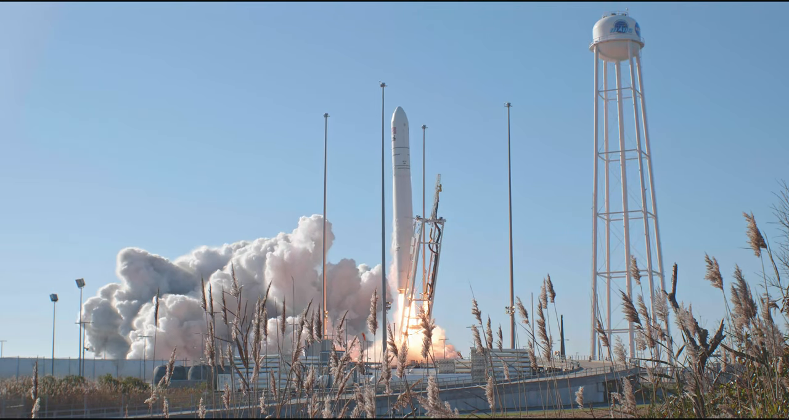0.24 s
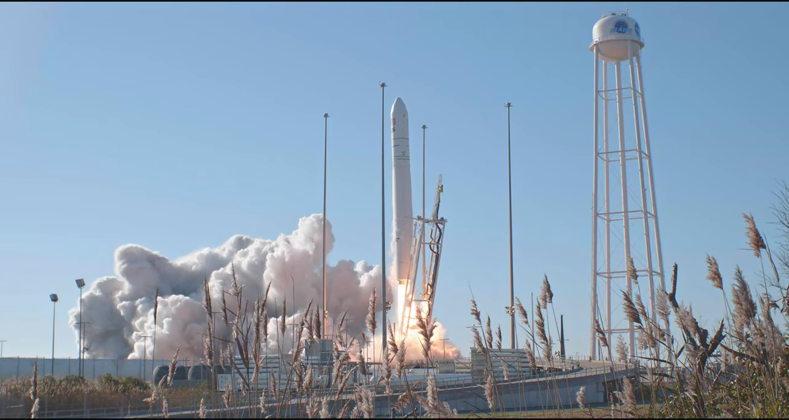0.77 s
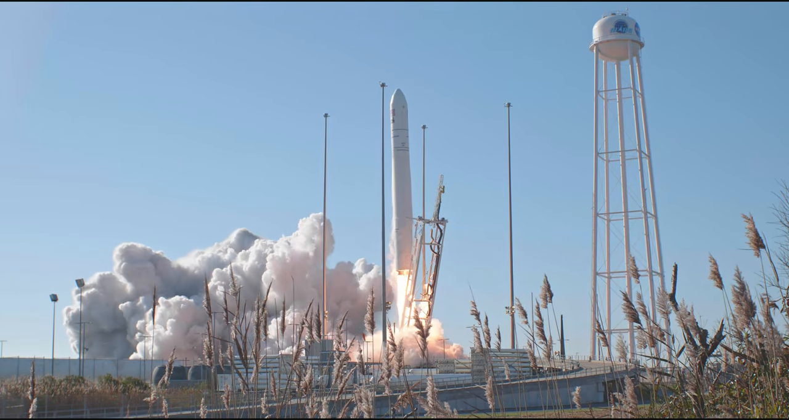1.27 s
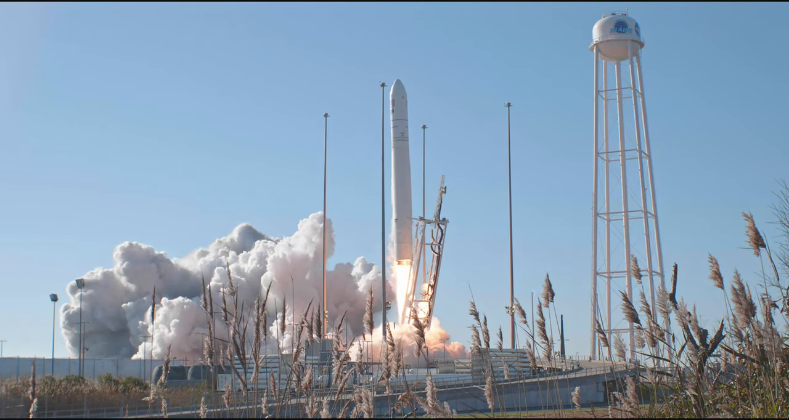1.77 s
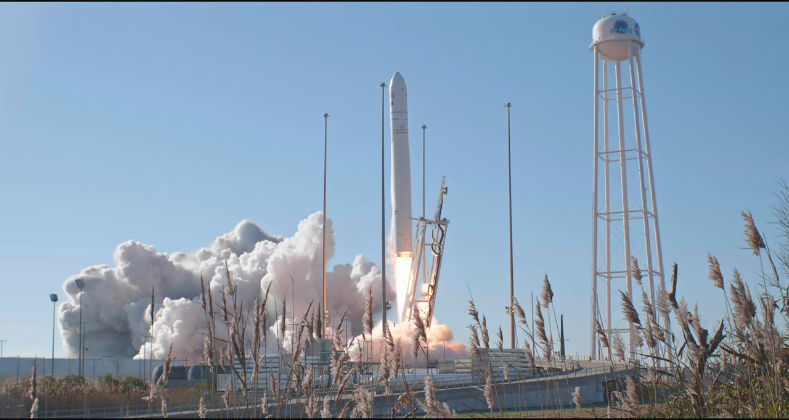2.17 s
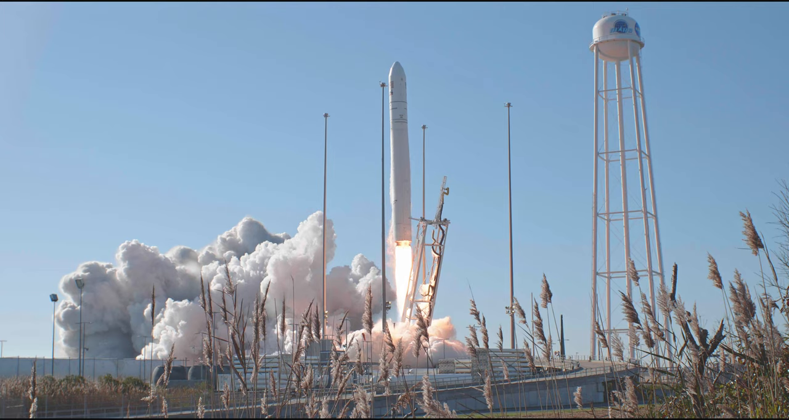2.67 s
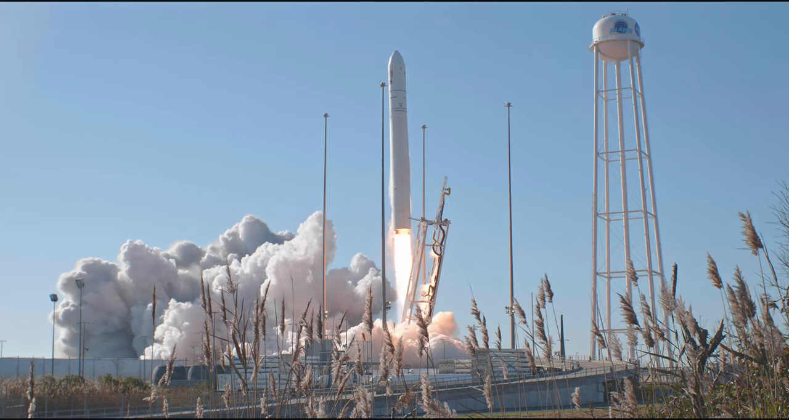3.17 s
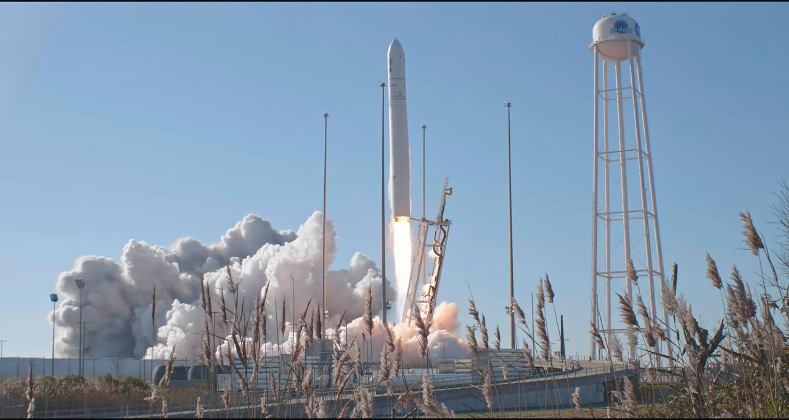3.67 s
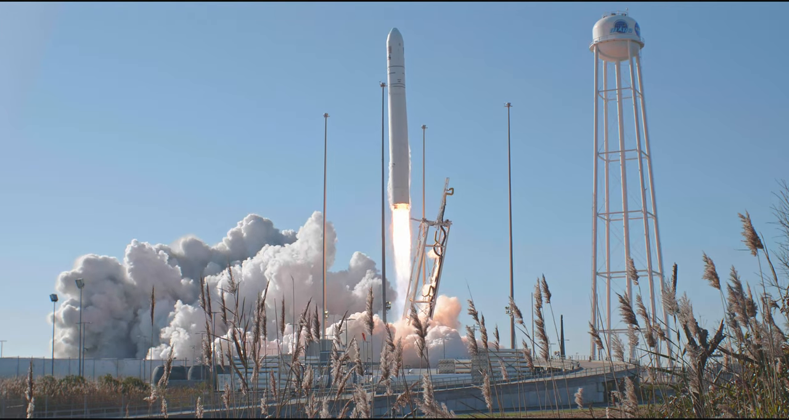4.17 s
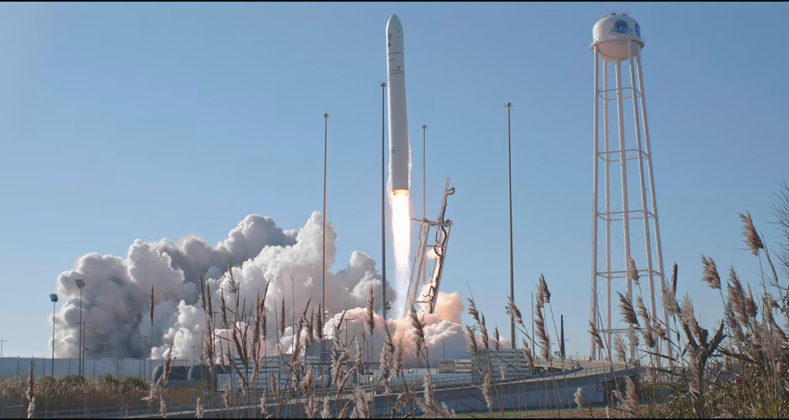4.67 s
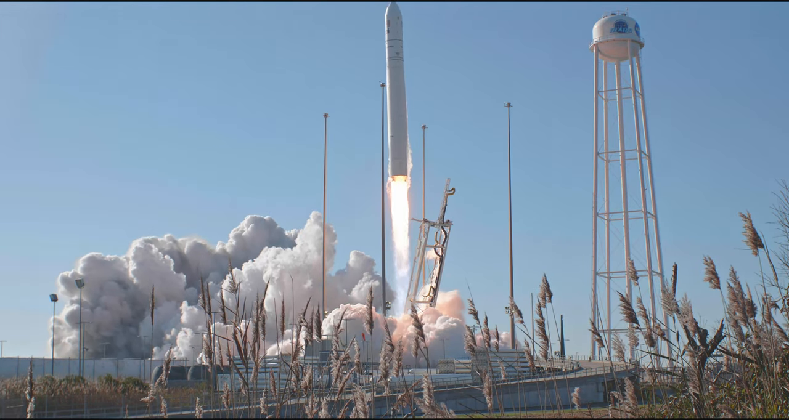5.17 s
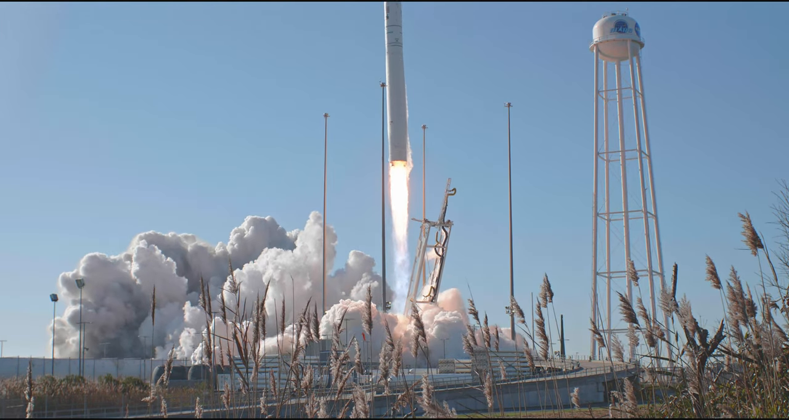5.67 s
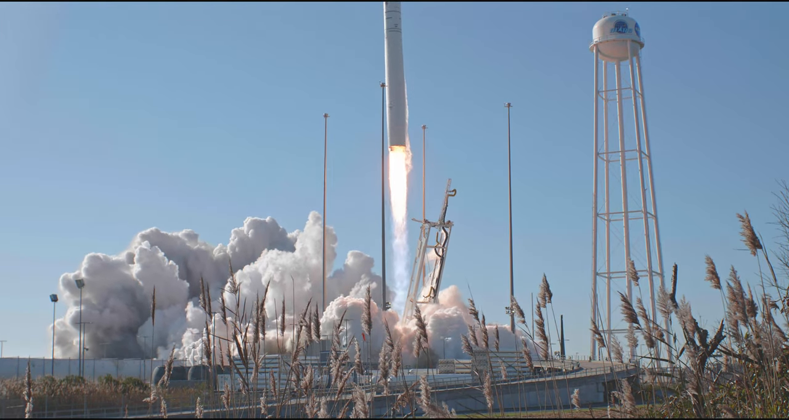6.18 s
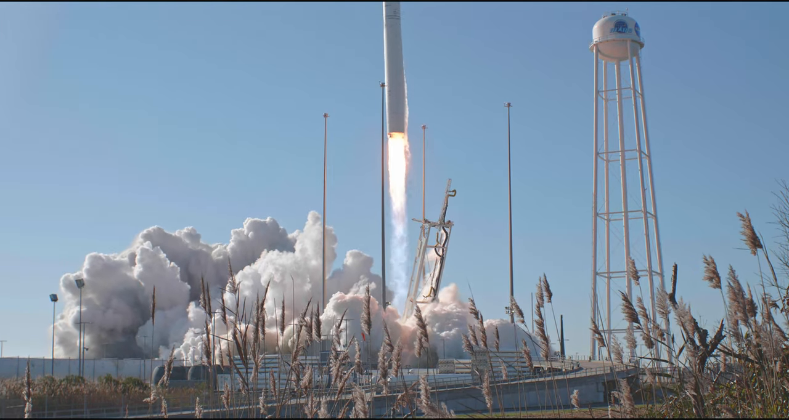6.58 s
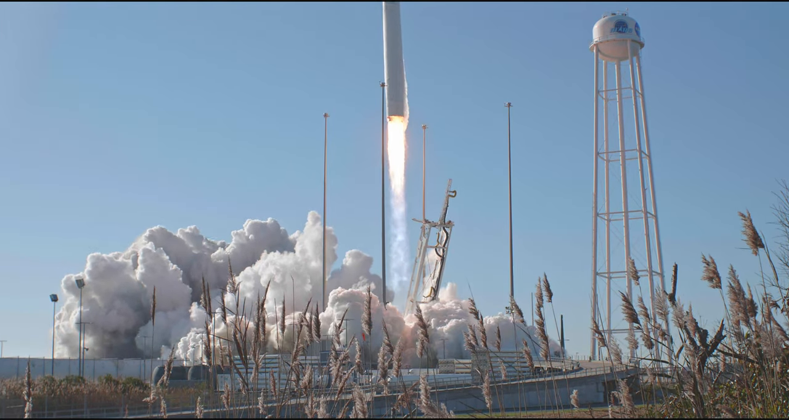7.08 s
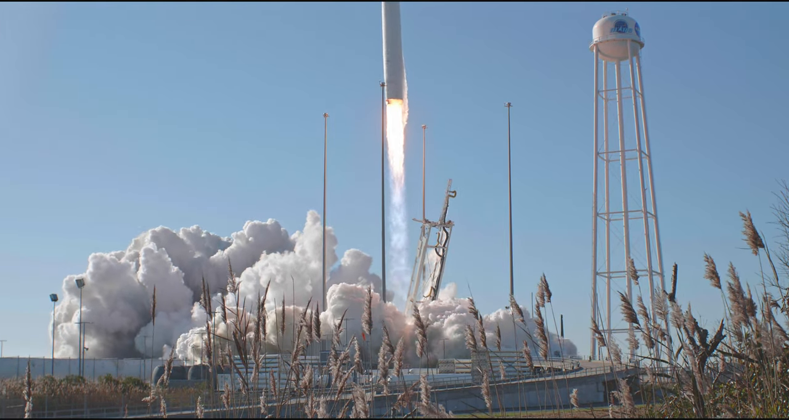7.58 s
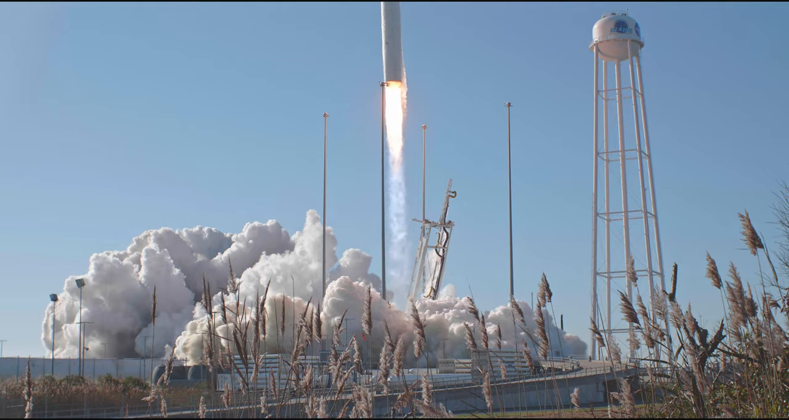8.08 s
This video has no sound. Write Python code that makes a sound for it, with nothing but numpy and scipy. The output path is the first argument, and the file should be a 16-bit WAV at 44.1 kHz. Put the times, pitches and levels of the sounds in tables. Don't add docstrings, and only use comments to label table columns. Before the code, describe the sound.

A rocket leaves its pad, heard outdoors across a marsh. A massive low roar is already at full force, with brief spray hiss and thin ticks. Crackle breaks through around two to three seconds, dulls behind steam, then returns much brighter after six. The stereo microphone is overloaded throughout, its flattened peaks rasping and fizzing.

```python
import sys
import numpy as np
from scipy import signal
from scipy.fft import rfft, irfft, next_fast_len
from scipy.io import wavfile
from scipy.ndimage import uniform_filter1d

SR = 44100
rng = np.random.default_rng(int(sys.argv[2]) if len(sys.argv) > 2 else 0)


def makeup_ratio(level_db):
    decades = np.asarray(level_db, float) / 20
    return 10 ** decades


def wav_record(signal):
    frames = np.transpose(np.atleast_2d(signal))
    bounded = np.clip(frames, -1, 1)
    quanta = np.round(bounded * 32767).astype(np.int16)
    wavfile.write(sys.argv[1], SR, quanta)


N = 367353

EDDY_CENTRES = (40, 100, 260, 1000)
# [level/dB, share of bareness swing, share of trench swing, share of column swing,
# gain once clear of the cloud/dB]
EDDY_LEVELS = [
    (-15, 0.01, 1, 0.0044, 0),
    (-18, 0.01, -0.45, -0.66, -2),
    (-17, 0.12, 0.16, 0.97, 0.5),
    (-28.5, 0.23, 0.021, -0.18, 4.5),
]
# [f/Hz, level per Hz/dB]
JET_SPECTRUM = [(12, -11.5), (28, -7.5), (50, 2.5), (100, 4), (200, -2.5), (400, -14.5), (800, -25),
                (1600, -39), (3200, -51), (6400, -85.5), (11000, -87), (16000, -88)]
# [f/Hz, likeness 0-1]
STEREO_LIKENESS = [(30, 1), (125, 0.98), (250, 0.98), (500, 0.85), (1000, 0.88), (2000, 0.4), (5000, 0),
                   (12000, 0.5)]
# [t/s, level/dB]
BARENESS = [(0, -42.5), (.3, -44.5), (.85, -53.5), (1.6, -59.5), (2.0, -48.5), (2.45, -45), (2.85, -43),
            (3.2, -56), (3.8, -58.5), (4.5, -59), (5.3, -50), (5.9, -53.5), (6.3, -44.5), (6.6, -47.5),
            (7.3, -46.5), (7.9, -43.5), (8.1, -44), (8.33, -46.5)]
# [t/s, level/dB]
TRENCH_RUMBLE = [(0, -5.5), (.5, 2), (2, 1), (3, -2.5), (4.2, 1.5), (5.3, 1), (6.4, 1), (7.2, -2),
                 (7.8, -16), (8.33, -6.5)]
# [t/s, level/dB]
FLAME_COLUMN = [(0.0, -23.5), (0.44, -23), (1.04, -20.5), (1.18, -19.5), (1.62, -20), (2.04, -18.5),
                (2.81, -19.5), (2.99, -17), (4.73, -23), (4.92, -21), (5.5, -24), (5.91, -17.5),
                (6.49, -19.5), (7.21, -17), (8.1, -18.5), (8.33, -15)]
# [t/s, f/Hz, level/dB]
BOOM_GLIDE = [(0, 74.85, -14), (.6, 70.24, -19.5), (1.3, 79.78, -15), (1.7, 95, -19), (2.4, 60, -30),
              (3.3, 99.75, -19), (4.3, 95.2, -22.5), (5.201, 39.95, -25), (5.8, 65.05, -22),
              (6.6, 110.4, -23), (7.302, 164.8, -22), (7.8, 175.3, -19.5), (8.33, 175.3, -20)]
# [t/s, f/Hz, level/dB]
HOWL_GLIDE = [(0, 330, -36), (1.8, 330, -32), (2.4, 260.1, -27), (3.0, 300, -24), (3.6, 240, -27.5),
              (4.5, 199.3, -35.5), (6.0, 190.4, -27.5), (7.0, 250.3, -29), (8.33, 200.2, -28)]
# [t/s, peak
# level of bright edge/dB, left minus right/dB, body over edge/dB]
HARD_FRONTS = [(0.944, -50, 4.5, 0.5), (0.9872, -44.5, -0.5, 5), (1.1428, -42, 2, 2), (1.36, -45, -4, 2),
               (1.639, -45.5, -3, 1.5), (1.6733, -52, 3.5, 5), (1.7762, -38, 1, 6.5), (1.8926, -46, 0, 0.5),
               (2.0458, -47, 3, 4.5), (2.1281, -47, 1, 7), (2.1791, -52, 3.5, 2), (2.2302, -46, -2, 11),
               (2.3366, -50, 0, 2.5), (2.3881, -44, 0.5, 4.5), (2.4251, -45, -1.5, 10.5),
               (2.4565, -40, 2.5, 8), (2.486, -44.5, -0.5, 4), (2.5031, -45.5, 1.5, 7), (2.627, -49, 1, 7),
               (2.6624, -51.5, 1.5, 12.5), (2.6808, -47.5, 0, 5), (2.7068, -45.5, 4.5, 6.5),
               (2.7509, -43.5, 2, 7), (2.8265, -43, -1, 4), (2.9065, -45.5, -2, -3.5),
               (2.9296, -44.5, -1.0, 5), (2.9491, -44, -3.5, 6.5), (3.0062, -44, -2.5, 8),
               (3.061, -39, 1, 4), (3.1191, -38.5, -4, 6.5), (3.1351, -40, -2, -1), (3.204, -50.5, 3, 3),
               (3.28, -52.5, -2, 6), (3.294, -45.5, -0.5, 0), (3.3559, -46.5, -4, -1),
               (3.4403, -51.5, -2.5, 6.5), (3.506, -47.5, 1, 4.5), (3.5313, -43, -3, 5),
               (3.5707, -50, 3, 8.5), (3.6687, -50, -3, 4), (3.8871, -45, -3, 0.5), (4.3472, -49.5, -2, 1),
               (4.5516, -51, 2, -1), (4.581, -51.5, -2.5, 2.5), (4.69, -53, 0.5, 3), (5.1797, -51.5, -1, 3),
               (5.3354, -48, -2, 7.5), (5.391, -46, -1.5, -1),
               (5.9289, -51, 0.5, 8.5), (6.1425, -53.5, -4, 7), (6.174, -40.5, 1.5, 2),
                    (6.2018, -45.5, -2, 11), (6.3058, -50.5, -1, 8), (6.3229, -40, -3, 6),
                    (6.3631, -44, -3, 7), (6.4288, -46.5, -2, 9), (6.493, -42, -2, 8.5),
                    (6.5716, -45, 2, 15), (6.5934, -38.5, -4, 6.5), (6.7244, -42, 2, 9),
                    (6.7545, -41, -3, 5), (6.8153, -55, -0.5, 9.5), (6.8277, -38, -2.5, 2.5),
                    (6.8498, -44, -3, 8.5), (6.87, -40.5, -1, 8.5), (6.917, -37.5, -1.5, 4),
                    (7.1378, -41.5, -0.5, 5.5), (7.1998, -43.5, 0.5, 5), (7.3375, -43, 2, 3),
                    (7.4148, -47.5, 0.5, 5.5), (7.4292, -48, -2, 5.5), (7.466, -41, -3, -0.5),
                    (7.4853, -41.5, 4.5, 0), (7.551, -40, 7, -5.5), (7.5928, -36.5, 2, -2),
                    (7.614, -42.5, 5.5, 7.5), (7.6272, -34.5, 2.0, 0), (7.6575, -41, -0.5, -1),
                    (7.7159, -44, 2.5, 9), (7.7657, -40, 3.5, 6), (7.786, -39, -1, 0.5),
                    (7.826, -34, 1, 0.5), (7.843, -40, 1, 4), (7.8614, -35, 1.5, -1),
                    (7.9082, -43.5, 0.5, 5), (7.9252, -37.5, 1.5, 6.5), (7.9431, -38, 3.5, 7),
                    (7.9852, -35.5, 3.5, 7.5), (8.02, -38, -1.5, 8), (8.061, -40, 1, 6.5),
                    (8.0999, -42, -2.5, 6), (8.1274, -43, -2, 8), (8.1578, -27.5, -4, 2),
                    (8.2144, -45.5, 0.5, 7), (8.2268, -37, 3.5, 4.5), (8.247, -42.5, -0.5, 6.5),
                    (8.268, -43.5, -4, 2.5), (8.2853, -40, -0.5, 5.5)]
# [t/s, peak level of the top/dB, body over top/dB]
THIN_TICKS = [(0.5263, -54, 7.5), (0.6033, -60.5, 13.5), (0.7238, -54.5, 9.5), (0.7579, -55, 8),
              (0.7977, -62.5, 13.5), (0.8243, -59, 11), (0.867, -62, 11), (0.8878, -55, 7.5),
              (0.9433, -60, 11), (0.9676, -57.5, 13.5), (0.9872, -53.5, 10), (1.0677, -60, 13),
              (1.1074, -58, 13), (1.1419, -52, 10), (1.1973, -57.5, 10.5), (1.2203, -60, 12),
              (1.2327, -57, 9.5), (1.3487, -56, 11.5), (1.3609, -50.5, 6), (1.3838, -58, 7),
              (1.4137, -56, 11), (1.4472, -59, 10), (1.6094, -54.5, 6.5), (1.6392, -53, 7),
              (1.6737, -56, 11), (1.7207, -54, 7), (1.762, -56.5, 13.5), (1.7759, -50.5, 9),
              (1.8277, -58, 15), (1.8564, -60, 13), (1.8697, -58.5, 10.5), (1.8927, -51, 8),
              (1.953, -55.5, 12.5), (2.0757, -55, 11.5), (2.098, -54, 10), (2.1276, -55, 13),
              (2.1795, -56.5, 13), (2.2219, -51.5, 13.5), (2.2733, -56, 13), (2.3008, -55, 12),
              (2.3176, -53, 9.5), (2.3656, -54, 16), (2.3875, -52, 14), (2.411, -54.5, 16.5),
              (2.3879, -51.5, 14), (2.4108, -56, 15), (2.4455, -57, 18), (2.4567, -47.5, 9),
             (2.4857, -54, 14), (2.5031, -54, 14), (2.5216, -53.5, 11), (2.554, -56.5, 14),
             (2.6094, -58, 16), (2.6268, -51.5, 12), (2.6385, -54, 14), (2.6627, -50.5, 13),
             (2.6802, -54, 16), (2.7076, -52.5, 14), (2.751, -48.5, 9), (2.7938, -52.5, 12),
             (2.8259, -54.5, 15), (2.8498, -54.5, 10), (2.8728, -59, 13), (2.8937, -50.5, 10),
             (2.9062, -51, 10), (2.9291, -52.5, 14), (2.9497, -54, 13), (2.9744, -58.5, 16),
             (3.007, -55.5, 15), (3.0322, -54, 12), (3.0613, -49, 8), (3.0921, -54.5, 8),
             (3.1187, -49.5, 5), (3.1357, -47, 3), (3.1553, -56, 12), (3.1804, -58.5, 11), (3.204, -57, 6),
             (3.2399, -58, 12), (3.2618, -55, 8), (3.2798, -59.5, 14), (3.2953, -57, 14), (3.3567, -56, 11),
             (3.3951, -66, 16), (3.412, -57.5, 10), (3.441, -58.5, 13), (3.4509, -60, 14),
             (3.5053, -57.5, 11), (3.5323, -56, 11), (3.5707, -63, 18), (3.5851, -57, 5),
             (3.6046, -60.5, 11), (3.6208, -54, 7), (3.637, -54.5, 8), (3.6684, -52.5, 5),
             (3.7594, -60.5, 11), (3.7971, -63, 18), (3.8157, -54, 9), (3.8485, -56.5, 12),
             (3.8864, -51, 7),
              (3.8864, -51, 7), (3.935, -60, 11), (3.9751, -59.5, 8), (4.0514, -65, 13), (4.0663, -62, 14),
               (4.0964, -57, 8.3), (4.1248, -54.5, 2), (4.1609, -54.5, 4), (4.2, -57.5, 8),
               (4.248, -61, 11), (4.284, -60.5, 10), (4.3184, -57.5, 5), (4.3463, -55, 5), (4.3837, -59, 9),
               (4.4426, -59.5, 11), (4.4596, -55.5, 6), (4.5035, -60, 6), (4.5381, -60, 13),
               (4.5514, -58, 12), (4.5808, -54.5, 7), (4.6905, -61, 10), (4.7297, -57, 10),
               (4.7545, -59, 11), (4.7848, -60, 11), (4.8498, -59, 12), (4.8721, -53.5, 3),
               (4.8891, -59, 12), (4.931, -56.5, 6), (5.0293, -62.5, 11), (5.1216, -57.5, 10),
               (5.1789, -59.5, 13), (5.2496, -62, 14), (5.2912, -59.5, 11), (5.3366, -52.5, 12),
               (5.3915, -52.5, 4), (5.4121, -59, 11), (5.4548, -58.5, 12), (5.5151, -61.5, 14),
               (5.598, -63.5, 11), (5.6104, -58, 7), (5.6444, -61, 11), (5.6977, -62.5, 16),
               (5.7246, -61, 11), (5.8018, -60.5, 15), (5.8525, -58.5, 14), (5.8974, -60.5, 12),
               (5.9167, -65, 22), (5.9292, -55.5, 11), (6.042, -61, 13), (6.0599, -58.5, 17),
               (6.1038, -58.5, 11), (6.1193, -57, 12), (6.1422, -53, 14), (6.1742, -45, 7),
               (6.2021, -53.5, 13), (6.3074, -54, 14),
              (6.3073, -54, 10), (6.3236, -51, 14), (6.3627, -52, 13), (6.4315, -52, 14),
               (6.4633, -51, 14), (6.5245, -54, 16), (6.5548, -54, 17), (6.5932, -46.5, 12),
               (6.6764, -57.5, 16), (6.6997, -57, 19), (6.7558, -47, 10), (6.8305, -47.5, 11),
               (6.8685, -48.5, 12), (6.9169, -48, 13), (6.9383, -52, 11), (7.003, -53, 12),
               (7.1025, -53.5, 13), (7.1379, -50.5, 10), (7.1481, -50, 9), (7.1647, -51.5, 13),
               (7.1988, -48.5, 9), (7.2302, -49, 11), (7.2569, -50, 7), (7.276, -49, 12.5),
               (7.3365, -43, 5), (7.4168, -59, 18), (7.4273, -50, 13), (7.4836, -48.5, 7), (7.531, -55, 12),
               (7.5523, -43.5, 0), (7.5937, -43.5, 6), (7.6193, -43.5, 8), (7.6578, -48, 12),
               (7.7153, -50, 13), (7.7664, -47, 13), (7.7845, -46.5, 5), (7.8249, -41.5, 4),
               (7.8446, -43.5, 4), (7.9082, -48, 10), (7.9261, -44.5, 13), (7.9445, -42.5, 12),
               (7.97, -50, 15), (7.983, -43.5, 12), (8.0179, -46, 11), (8.0618, -45.5, 8),
               (8.0788, -53, 12), (8.0997, -48, 9.5), (8.1268, -45.5, 8), (8.1579, -40.5, 2),
               (8.2155, -45.5, 9), (8.2703, -43.5, 5)]
# [t/s, level/dB]
MIXING_VIGOUR = [(0.03, -58), (0.26, -56.5), (0.49, -59), (0.79, -61.5), (1.69, -66.5), (2.13, -65.5),
                 (2.9, -59.5), (3.29, -69.5), (3.61, -75), (4.47, -74.5), (5.02, -70.5), (5.46, -71),
                 (5.83, -70), (6.5, -57), (6.83, -58.5), (7.52, -54), (7.82, -54.5), (8.33, -55.5)]
# [t/s, strength 0-1, lag/ms]
MARSH_ECHO = [(0, 0, 4), (1.3, .3, 4), (2, .2, 3.6), (2.6, 0.3, 3.5), (3.3, 0.3, 3.6), (4, 0.3, 3.7),
              (4.7, .1, 4.5), (5.5, .1, 5.5), (6.5, .1, 6.5), (7.5, 0.22, 8), (8.33, 0, 9.7)]

FRONT_DB, FRONT_FOLLOWS = -44, 0.97
DELUGE_DB = 12
PAN_DB = 4.5
SNAP_GAP = 200
SKEW_SAMPLES = 1.5
CRACKLE_OWN = 1.1


def exhaust():
    size = next_fast_len(N)
    hz = np.maximum(np.arange(size // 2 + 1) * SR / size, 1)
    mid, side = rfft(rng.standard_normal((2, size)))
    alike = np.clip(at_hz(STEREO_LIKENESS, hz), 0, 1)
    pair = np.sqrt(1 + alike) * mid + np.sqrt(1 - alike) * side * [[1], [-1]]
    pair = pair * makeup_ratio(at_hz(JET_SPECTRUM, hz)) * (hz > 8)
    bare_db, trench_db, column_db = swing_db(BARENESS), swing_db(TRENCH_RUMBLE), swing_db(FLAME_COLUMN)
    clear = clear_of_cloud()
    gust = drift(68.0)
    gust_depth_db = (0.1, 0.3, 0.5, 1.0)
    out = 0
    for k, (db, bare, trench, column, clear_db) in enumerate(EDDY_LEVELS):
        level_db = db + bare * bare_db + trench * trench_db + column * column_db + clear_db * clear
        share = np.sqrt(at_hz(list(zip(EDDY_CENTRES, np.eye(4)[k])), hz))
        eddies = rms_one(irfft(pair * share, size)[:, :N])
        out = out + eddies * makeup_ratio(level_db + gust_depth_db[k] * gust)
    return out


def steepen(wave):
    lead = 0.1 * SR / 1000
    return np.array([np.interp(np.arange(N) + lead * w, np.arange(N), w) for w in wave])


def boom(rows, width_hz):
    s, hz, db = np.transpose(rows)
    time = np.arange(N) / SR
    phase = 2 * np.pi * np.cumsum(np.interp(time, s, hz)) / SR
    wander = drift(width_hz) * np.cos(phase) + drift(width_hz) * np.sin(phase)
    return makeup_ratio(np.interp(time, s, db)) * wander


def shocks():
    late_s, hold_s = 0.00119, 0.0054
    s, peak_db, pan_db = np.transpose(np.vstack([hardest()[:, :3], lesser_fronts()]))
    jump_db = np.minimum(0.71 * (peak_db + 16.5), -14)
    starts = np.zeros((2, N))
    starts[:, ((s + late_s) * SR).astype(int)] = makeup_ratio(jump_db + 0.1 * pan_db * [[1], [-1]])
    fall = np.exp(-1 / (hold_s * SR))
    after = signal.lfilter([1], [1, -fall], starts + 1e-18)
    before = signal.lfilter([0, 1], [1, -fall], starts[:, ::-1] + 1e-18)[:, ::-1]
    return lowpass(after - before, 1550)


def hardest():
    s, edge_db, pan_db, body_db = np.transpose(np.array(HARD_FRONTS))
    return np.transpose([s, edge_db + body_db + 1.5, pan_db, -19.5 - body_db])


def lesser_fronts():
    per_s = 45
    bare_db = swing_db(BARENESS)
    odds = per_s * makeup_ratio(0.6 * bare_db[:N - 200]) / SR
    at = np.flatnonzero(rng.random(N)[:N - 200] < odds)
    chance = rng.standard_normal((N, 2))[at]
    peak_db = FRONT_DB + FRONT_FOLLOWS * bare_db[at] - DELUGE_DB * deluge()[at] + 0.8 * chance[:, 0]
    return np.transpose([at / SR, peak_db, PAN_DB * chance[:, 1]])


def crackles(wave):
    s, peak_db, pan_db, edge_db = np.transpose(np.vstack([hardest(), steep_rises(wave)]))
    noise = rng.standard_normal(N) + CRACKLE_OWN * rng.standard_normal((2, N))
    skew = rng.standard_normal(N)
    at = (s * SR).astype(int)
    at = np.clip([at, at + np.round(SKEW_SAMPLES * skew[at]).astype(int)], 0, N - 1)
    body = (1, peak_db - 11.0, [1800, 6500], 0.0047)
    edge = (-1, peak_db + edge_db + 13.5, [4500, 11000], 0.012)
    out = 0
    for sign, level_db, band_hz, t60_s in (body, edge):
        starts = np.zeros((2, N))
        starts[[[0], [1]], at] = makeup_ratio(level_db + pan_db * [[.5], [-.5]])
        burst = 0.66 * die_away(starts, t60_s) * noise + 1.9 * starts
        out = out + sign * bandpass(burst, band_hz)
    return out


def steep_rises(wave):
    slope = np.gradient(uniform_filter1d(wave.mean(0), size=9))
    slope = slope / slope.std()
    at = signal.find_peaks(slope, height=2, distance=SNAP_GAP)[0]
    at = at[np.abs(at[:, None] - hardest()[:, 0] * SR).min(1) > SNAP_GAP]
    chance = rng.standard_normal((N, 2))[at]
    steepness_db = 20 * np.log10(np.minimum(slope[at] / 2, 2.5))
    peak_db = -48.5 + FRONT_FOLLOWS * swing_db(BARENESS)[at] + 0.4 * steepness_db
    peak_db = peak_db - DELUGE_DB * deluge()[at]
    edge_db = -49 + 0.2 * at / SR + 4.0 * drift(5.0)[at] + 2.0 * chance[:, 1]
    return np.transpose([at / SR, peak_db, PAN_DB * chance[:, 0], edge_db])


def ticks():
    s, top_db, body_db = np.transpose(np.array(THIN_TICKS))
    alone = np.abs(s[:, None] - hardest()[:, 0]).min(1) > SNAP_GAP / SR
    pan_db = 4.0 * rng.standard_normal(len(s)) * [[.5], [-.5]]
    noise = rng.standard_normal(N) + CRACKLE_OWN * rng.standard_normal((2, N))
    skew = 2 * SKEW_SAMPLES * rng.standard_normal(len(s)) * [[0], [1]]
    at = (s * SR + skew).astype(int)
    top = (makeup_ratio(top_db), [5000, 14500], 0.014)
    body = (makeup_ratio(top_db + body_db + 4.5) * alone, [1000, 5000], 0.005)
    out = 0
    for gain, band_hz, t60_s in (top, body):
        starts = np.zeros((2, N))
        starts[[[0], [1]], at] = gain * makeup_ratio(pan_db)
        out = out + bandpass(starts + 0.45 * die_away(starts, t60_s) * noise, band_hz)
    return out


def mixing_hiss():
    noise = rng.standard_normal(N) + 1.1 * rng.standard_normal((2, N))
    hiss = bandpass(noise, [1800, 3600], order=1)
    hiss = lowpass(hiss, 7000)
    steadiness = 1 - 0.66 * deluge() - 0.45 * clear_of_cloud()
    spits = makeup_ratio((3.5 * drift(160) + 2.0 * drift(18.0)) * steadiness)
    return rms_one(hiss * spits) * makeup_ratio(-60.5 + 1.61 * swing_db(MIXING_VIGOUR))


def with_ground(wave):
    s, strength, lag_ms = np.transpose(MARSH_ECHO)
    time = np.arange(N) / SR
    dull = lowpass(wave, 825, order=1)
    late = np.arange(N) - np.interp(time, s, lag_ms) * SR / 1000
    echo = np.array([np.interp(late, np.arange(N), d) for d in dull])
    return wave + np.interp(time, s, strength) * echo


def overload(bent):
    ceiling, hardness, corner_hz, closing_s = 0.395, 12, 4530, 0.002
    flat = bent / (1 + np.abs(bent / ceiling) ** hardness) ** (1 / hardness)
    r = np.exp(-2 * np.pi * corner_hz / SR)
    flat = signal.lfilter([1 - r], [1, -r], flat, zi=r * flat[:, :1])[0]
    flat = flat * np.minimum((N - 1 - np.arange(N)) / (closing_s * SR), 1)
    open_stage = 1 - 0.7 * uniform_filter1d(1. * (np.abs(bent) > ceiling), size=15)
    return flat, open_stage


def capsule_fizz(bent):
    fizz = makeup_ratio(-29.5) * np.clip(bent - 0.86, 0, .4) * rng.standard_normal((2, N))
    return lowpass(fizz, 4440)


def ripple():
    noise = rng.standard_normal((2, N))
    return makeup_ratio(-44.5) * rms_one(bandpass(noise + noise[:1], [253, 1100]))


def background_hiss():
    level_db = -75.5 + 0.3 * swing_db(MIXING_VIGOUR) + 3.5 * drift(40.0)
    return makeup_ratio(level_db) * rng.standard_normal((2, N))


def deluge():
    return np.exp(-(np.arange(N) / SR / 0.55) ** 2)


def clear_of_cloud():
    return .5 + .5 * np.tanh((np.arange(N) / SR - 6.4) / 0.18)


def swing_db(rows):
    level = np.interp(np.arange(N) / SR, *np.transpose(rows))
    return level - level.mean()


def drift(rate):
    r = np.exp(-2 * np.pi * rate / SR)
    slow = signal.lfilter([1], [1, -2 * r, r * r], rng.standard_normal(N + SR))[SR:]
    return rms_one(slow - slow.mean())


def die_away(starts, t60_s):
    return signal.lfilter([1], [1, -makeup_ratio(-60 / (t60_s * SR))], starts + 1e-18)


def bandpass(x, band_hz, order=2):
    return signal.sosfilt(signal.butter(order, band_hz, "band", fs=SR, output="sos"), x)


def lowpass(x, hz, order=2):
    return signal.sosfilt(signal.butter(order, hz, fs=SR, output="sos"), x)


def at_hz(points, hz):
    return np.interp(np.log(hz), np.log(np.array(points)[:, 0]), np.array(points)[:, 1])


def rms_one(x):
    return x / np.sqrt(np.mean(x ** 2) + 1e-20)


def scene():
    roar = with_ground(steepen(makeup_ratio(-1) * exhaust()))
    roar = roar + shocks() + boom(BOOM_GLIDE, 14.0) + boom(HOWL_GLIDE, 30.0)
    roar = roar + 1.5 * np.exp(-np.arange(N) / (0.0015 * SR))
    return roar * makeup_ratio([[0], [0.7]])


def band_limit(x):
    return signal.sosfilt(signal.butter(12, 15900, fs=SR, output="sos"), x)


def record(dry):
    bent = dry + 0.3 * dry ** 2
    bent = signal.sosfilt(signal.butter(1, 6.0, "high", fs=SR, output="sos"), bent - bent.mean())
    flat, open_stage = overload(bent)
    hiss = open_stage * (mixing_hiss() + background_hiss())
    treble = capsule_fizz(bent) + crackles(dry) + ticks() + hiss
    return band_limit(flat + ripple() + treble)


dry = scene()
out = record(dry)
wav_record(out)
```